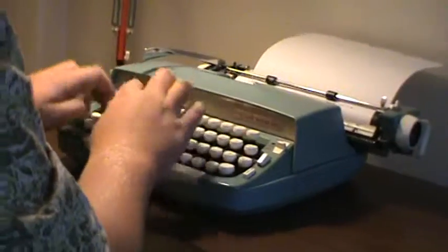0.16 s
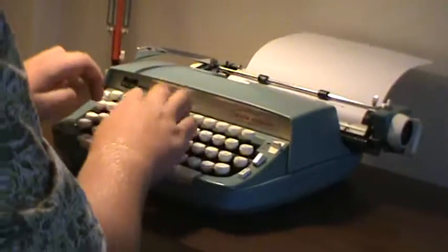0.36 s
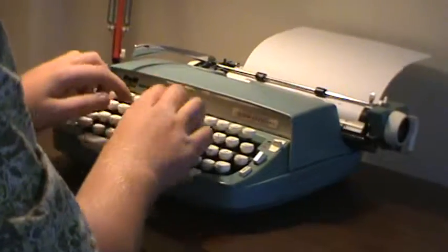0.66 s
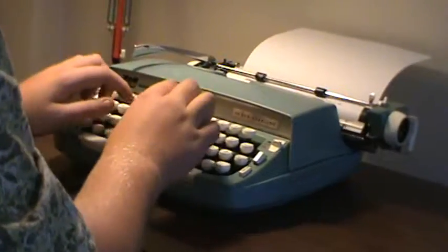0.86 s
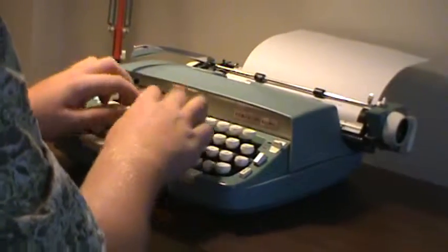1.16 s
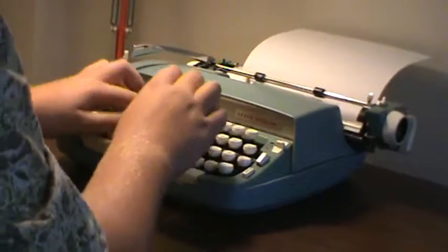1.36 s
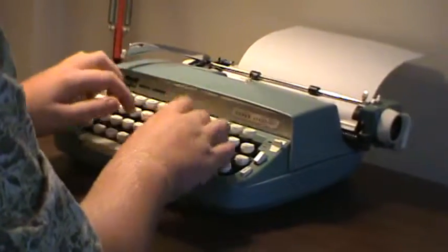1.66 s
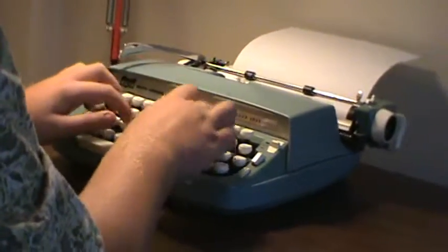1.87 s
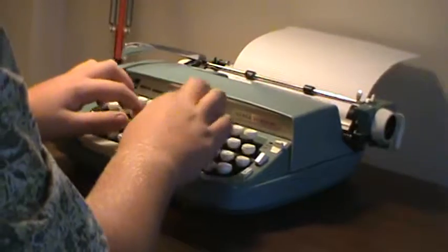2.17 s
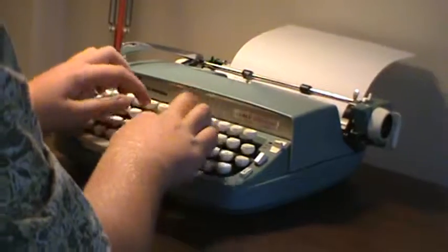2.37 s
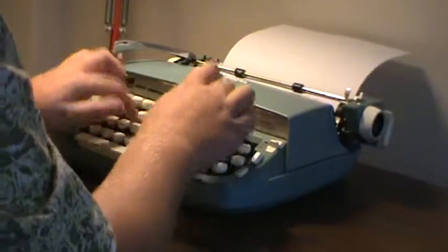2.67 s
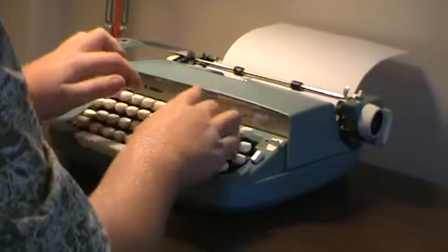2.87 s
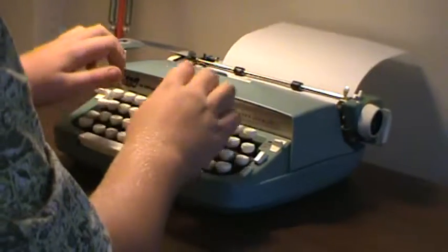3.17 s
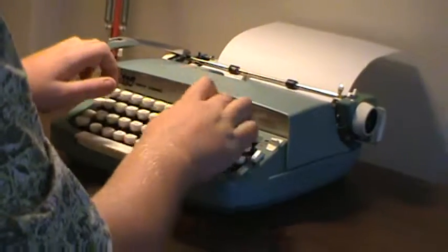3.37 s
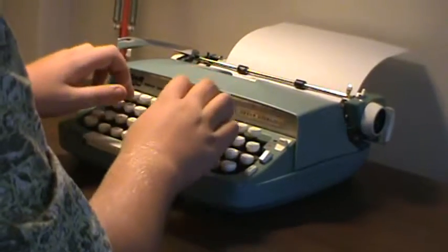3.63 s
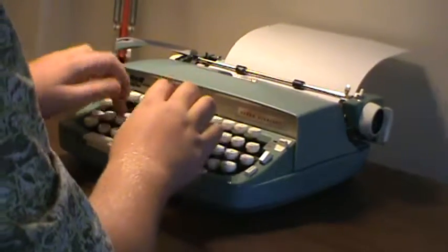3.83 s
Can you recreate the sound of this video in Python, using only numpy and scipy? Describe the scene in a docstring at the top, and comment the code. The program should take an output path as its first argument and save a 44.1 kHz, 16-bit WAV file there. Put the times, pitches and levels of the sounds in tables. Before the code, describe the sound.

Close by in a small, quiet room, someone types on a manual typewriter. Sharp, bright clacks with a light metal ring come in short bursts, then a longer run, followed by lever rattles, a snap and a final strike.

```python
"""Manual typewriter in a bare room

On a wooden desk in a small room, close and centred before a stereo microphone, typed in uneven bursts.
Each key rattles its linkage, slaps a type bar on the platen, steps the carriage and drops back.
The walls return every slap in the same pattern; the recorder's fast limiter flattens it into a clack."""
import sys
import numpy as np
from scipy import signal
from scipy.fft import rfft, irfft
from scipy.io import wavfile
from scipy.ndimage import uniform_filter1d, minimum_filter1d

SR = 44100
rng = np.random.default_rng(int(sys.argv[2]) if len(sys.argv) > 2 else 0)


def dump(signal):
    """Clip the signal to [-1, 1] and save it as 16-bit WAV at the path in sys.argv[1]."""
    limited = np.clip(np.atleast_2d(signal).T, -1, 1)
    pcm = np.round(limited * 32767).astype(np.int16)
    wavfile.write(sys.argv[1], SR, pcm)


N = 176400


# letters typed: t/s, level/dB, brightness/(dB per octave), key travel/s, key rattle/dB, fall-back/dB
STRIKES = [(0.015, 18.5, 0.5, 0.039, 14, -3), (0.2336, 16.5, 2, 0.041, 0.5, -12),
           (0.3026, 17, 1.5, 0.043, 3, -15), (.451, 20, 1, 0.046, 0.5, 0), (1.085, 19, 1, 0.043, -1.5, -6),
           (1.2503, 19, 1.5, 0.032, -18, -21), (1.3843, 19, 1, 0.032, 0, 1.5),
           (1.6987, 18.5, 1.5, .043, 2, -5), (1.8687, 19, 0, 0.052, -1, -8),
           (2.008, 19.5, 0, 0.04, -3, -11), (2.1273, 20.5, 2, 0.036, -9.5, -2.5),
           (2.2972, 17.5, 2, 0.056, -10, -1), (2.3886, 17.5, 1, 0.044, -17, 2),
           (2.5108, 19.5, 2, 0.052, -6.5, -20), (2.629, 15, 0, 0.04, -5.5, 6.5),
           (2.75, 20.5, 4.5, 0.033, 0, -17), (2.907, 15, 0.5, 0.046, 1.5, -12),
           (3.023, 16, 2, 0.026, -9, -6), (3.8229, 20.5, 3, 0.037, -1, -1.5)]

def type_bars(count=4, variation=.3):
    """Nearly the same sharp slap on the platen for every letter, dealt in turn to a few tracks."""
    tracks, usual_slap = np.zeros((count, N)), burst()
    for k, (s, db, bright_db, *_) in enumerate(STRIKES):
        slap = unit(usual_slap + variation * burst())
        add(tracks[k % count], s, amp(db) * tilt(slap, bright_db))
    return tracks


# the slap head-on at the microphone: f/Hz, level/dB
CRACK_SPECTRUM = [(600, -26), (1800, -20), (3500, 9.5), (6000, 9), (8700, 14), (10300, -0.5), (12500, -1),
                  (14000, -6), (16000, -18)]

def platen_crack(slaps, bounce_s=.011, bounce_db=2.5):
    """The slap arrives straight from the platen, then comes back once with its treble intact."""
    crack = amp(-13) * colour(slaps, CRACK_SPECTRUM)
    add(crack, bounce_s, amp(bounce_db) * crack)
    return crack


# modes of the type bars: f/Hz, level/dB
BAR_MODES = [(5329, 0), (5626, -2), (5879, 0), (6197, -1), (6442, -2), (6966, -2)]

def bar_ring(track, detune=.04, t60=.42):
    """The struck bars ring on, each track at a slightly different pitch."""
    pitch = 1 + detune * rng.uniform(-1, 1)
    ringing = ring([(hz * pitch, db, t60) for hz, db in BAR_MODES])
    return amp(-14) * signal.oaconvolve(track, ringing)[:N]


# light rattles of the space bar and levers: t/s, level/dB
LEVER_RATTLES = [(.624, -3.5), (.688, -1.5), (1.559, -1.5), (3.3096, -3.5), (3.345, -4), (3.502, -3)]
# the linkage from close by: f/Hz, level/dB
LINKAGE_SPECTRUM = [(60, -15), (150, -2.5), (260, -3.5), (480, 3.5), (800, 0), (1300, 2.5), (2500, 2),
                    (5000, 3), (8000, -1), (11500, -2.5), (16000, -15)]

def linkage(trip_s=.0099, fall_s=.122, key_t60=.12, fall_t60=.11):
    """Levers rattle as a key goes down, trips the escapement and lets its bar fall back."""
    out = np.zeros(N)
    for s, _, _, travel_s, key_db, fall_db in STRIKES:
        add(out, s - travel_s, amp(key_db) * rattle(key_t60))
        add(out, s - trip_s, amp(-2) * rattle(key_t60))
        add(out, s + fall_s, amp(fall_db) * rattle(fall_t60))
    for s, db in LEVER_RATTLES:
        add(out, s, amp(db) * rattle(fall_t60))
    return colour(out, LINKAGE_SPECTRUM)


# keys coming to rest: t/s, level/dB, f/Hz
KEY_KNOCKS = [(.63, -10.5, 547), (1.195, -13, 523), (1.227, -10, 344), (1.905, -8, 466), (2.335, -11, 435),
              (3.502, -7, 450), (3.511, -13.5, 342)]
# a dull wooden knock: f/Hz, level/dB
KNOCK_SPECTRUM = [(50, -23), (110, -16), (145, -1.5), (180, -11), (330, -3.5), (520, 3), (720, -4.5),
                  (1400, 1.5), (3000, -15.5), (12000, -49)]

def frame_knocks(step_s=.03, t60=.062):
    """The carriage stops against the frame; resting keys knock it with a short note of their own."""
    thuds, notes = np.zeros(N), np.zeros(N)
    for s, *_ in STRIKES:
        add(thuds, s + step_s, amp(-4) * rattle(t60))
    for s, db, hz in KEY_KNOCKS:
        add(thuds, s, .5 * amp(db) * rattle(t60))
        add(notes, s, amp(db) * ring([(hz, 0, t60)]))
    return colour(thuds, KNOCK_SPECTRUM) + notes


# snaps after the space bar: t/s, level/dB
SPACE_SNAPS = [(3.378, 5), (3.3808, 8), (3.385, 0.5)]
# the snap from close by: f/Hz, level/dB
SNAP_SPECTRUM = [(200, -12), (500, 0.5), (2000, -1.5), (4600, 3.5), (5900, 9.5), (7500, 1.5), (9500, -6.5),
                 (16000, -16)]

def escapement():
    """The escapement snaps on a space, metal on metal in quick succession."""
    out = np.zeros(N)
    for s, db in SPACE_SNAPS:
        add(out, s, amp(db) * burst())
    return colour(out, SNAP_SPECTRUM)


# clinks of the shift mechanism: t/s, level/dB, brightness/(dB per octave)
SHIFT_CLINKS = [(0.6928, 0, -3), (1.582, -5, -8)]
# its modes: f/Hz, level/dB, t60/s
SHIFT_MODES = [(2120, -4, .012), (2125, -32, .25), (4350, 0, .005), (4750, 0, .005), (7700, -4, .004)]

def shift_mechanism():
    """A short blow sets the metal of the shift mechanism clinking."""
    out = np.zeros(N)
    for s, db, bright_db in SHIFT_CLINKS:
        clink = signal.fftconvolve(burst(), ring(SHIFT_MODES))
        add(out, s, amp(db) * unit(tilt(clink, bright_db)))
    return out


# pings of the spring: t/s, level/dB
SPRING_PINGS = [(.13, -13), (3.151, -14.5)]
# its modes: f/Hz, level/dB, t60/s
SPRING_MODES = [(11100, 0, .03), (11400, -6, .1)]

def return_spring():
    """A small return spring pings, high and brief."""
    out = np.zeros(N)
    for s, db in SPRING_PINGS:
        add(out, s, amp(db) * ring(SPRING_MODES))
    return out


def desk_sway(delay_s=.0404, length_s=.097, sway_hz=66.2):
    """The desk sways under the machine, soft and low, after each carriage step."""
    out, t = np.zeros(N), np.arange(0, length_s, 1 / SR)
    swell = amp(-48.5) * np.sin(np.pi * t / length_s) ** 2
    for s, *_ in STRIKES + SPACE_SNAPS[:1]:
        hz = sway_hz * (1 + .079 * rng.standard_normal())
        add(out, s + delay_s, swell * np.sin(2 * np.pi * hz * t))
    return out


# echoes off the near walls: delay/s, level/dB, lag of the right channel/s
WALL_ECHOES = [(.0059, -7.5, 0), (.013, -8.5, -.00006), (.0205, -15, 0), (.0255, -9.5, -.00004),
               (.0287, -13.5, 0)]

def room(x, usual_tail, variation=.55):
    """Distinct wall echoes, then a tail that shifts a little as hands and carriage move."""
    response = np.sqrt(1 - variation ** 2) * usual_tail + variation * tail()
    for delay, db, lag in WALL_ECHOES:
        add(response[0], delay, amp([db]))
        add(response[1], delay + lag, amp([db]))
    return signal.fftconvolve(x[None], response, axes=1)[:, :N]


# the slap as it leaves for the walls: f/Hz, level/dB
SLAP_SPECTRUM = [(100, -38.5), (450, -20.5), (1500, -17.5), (2400, -14), (3400, -10), (4600, -9.5),
                 (5900, 1), (7200, -7.5), (8800, -11), (10500, -20.5), (15500, -36.5)]

def reflected_slaps(tracks, usual_tail):
    """The room returns a duller slap, each track with a slightly different tail."""
    return sum(room(colour(track, SLAP_SPECTRUM), usual_tail) for track in tracks)


# decay of the bare room: f/Hz, t60/s
ROOM_DECAY = [(150, .45), (1200, .54), (3000, .47), (6000, .44), (15000, .33)]
# stereo width at the microphone: f/Hz, side level/dB
ROOM_WIDTH = [(100, -29), (700, -9.5), (1500, -4.5), (9000, -4.5), (12000, -15)]

def tail(start_s=.00067, build_s=.028):
    """Diffuse reverberation from all around, nearly mono in the bass."""
    hz, when, bands = signal.stft(rng.standard_normal((2, SR)), SR, nperseg=256)
    bands = bands * fade(when, read(ROOM_DECAY, hz)[:, None])
    bands[1] *= amp(read(ROOM_WIDTH, hz))[:, None]
    build_up = np.clip((np.arange(SR) / SR - start_s) / build_s, 0, 1)
    mid, side = signal.istft(bands, SR, nperseg=256)[1][:, :SR] * build_up
    return np.array([mid + side, mid - side]) / np.linalg.norm(mid)


# the quiet room behind the machine: f/Hz, level/dB
HUSH_SPECTRUM = [(25, -1), (60, 17.5), (110, 0), (500, 7.5), (2300, -9.5), (14000, -13.5)]

def room_tone(level_db=-59.5, width=.27):
    """A faint, steady hush, narrow between the channels."""
    mid, side = (amp(level_db) * colour(rng.standard_normal(N), HUSH_SPECTRUM) for _ in range(2))
    return mid + width * np.array([side, -side])


def burst(length_s=.0028, size=512, passes=3):
    """A few milliseconds of dense metal chatter with an even spectrum."""
    shape = np.exp(-(np.arange(size) / SR / length_s) ** 2)
    x = rng.standard_normal(size) * shape
    for _ in range(passes):
        x = whiten(x)
        envelope = np.sqrt(abs(uniform_filter1d(x ** 2, size=24)) + 1e-12)
        x = shape * x / envelope
    for _ in range(2 * passes):
        x = whiten(x) * shape ** .25
    return unit(x)


def rattle(t60, contacts_per_s=12000, spread_db=3, rise_s=.003, size=8192):
    """A dying cluster of tiny contacts of uneven size."""
    t = np.arange(size) / SR
    strengths = amp(spread_db * np.minimum(rng.exponential(1, size), 2))
    signs = rng.choice([-1, 1], size)
    contacts = rng.random(size) < contacts_per_s / SR
    return unit(strengths * signs * contacts * np.minimum(t / rise_s, 1) * fade(t, t60))


def ring(modes):
    """Decaying partials of a struck part."""
    t = np.arange(SR) / SR
    return unit(sum(amp(db) * fade(t, t60) * np.sin(2 * np.pi * (hz * t + rng.random()))
                    for hz, db, t60 in modes))


def colour(x, points, size=4096):
    """Minimum-phase filter of unit energy with the given spectrum."""
    log_gain = np.log(amp(read(points, abs(np.fft.fftfreq(size, 1 / SR)))))
    taps = np.fft.ifft(np.exp(np.conj(signal.hilbert(log_gain)))).real
    return signal.oaconvolve(x, unit(taps[:size // 2]))[:len(x)]


def tilt(x, bright_db):
    """Brightens a blow by so many dB per octave about 6 kHz."""
    octaves = np.log2(np.maximum(np.fft.rfftfreq(len(x), 1 / SR), 1000) / 6000)
    return irfft(rfft(x) * amp(bright_db * octaves), len(x))


def whiten(x):
    """Flattens the spectrum, keeping the phases."""
    return irfft(np.exp(1j * np.angle(rfft(x))))


def amp(db):
    """Decibels to gain."""
    return 10 ** (np.asarray(db) / 20)


def read(points, hz):
    """A table's value on a log-frequency axis."""
    f, value = np.transpose(points)
    return np.interp(np.log(hz + 1), np.log(f), value)


def unit(x):
    """Scales to an energy of one."""
    return x / np.sqrt(np.sum(x ** 2) + 1e-20)


def fade(t, t60):
    """Exponential decay, 60 dB down at t60."""
    return np.exp(-np.log(1000) * t / t60)


def add(mix, s, sound):
    """Mixes a sound in at s seconds."""
    at = round(s * SR)
    sound = sound[max(-at, 0):]
    part = mix[max(at, 0):][:len(sound)]
    part += sound[:len(part)]


def scene():
    """At the microphone: the machine in the centre, the walls around it, faint room tone behind."""
    tracks, usual_tail = type_bars(), tail()
    mechanism = linkage() + frame_knocks() + escapement() + shift_mechanism() + return_spring()
    direct = platen_crack(tracks.sum(0)) + amp(.5) * mechanism + desk_sway()
    reflected = reflected_slaps(tracks, usual_tail) + room(mechanism, tail())
    ringing = sum(bar_ring(track) for track in tracks)
    return direct + reflected + ringing + room_tone()


def record(dry, limit_db=-11, recover_db_per_s=223, sense_s=.0005, ahead_s=.0016, cutoff_hz=15950):
    """The recorder's look-ahead limiter ducks each slap and recovers quickly; a low-pass follows."""
    power = uniform_filter1d((dry ** 2).mean(0), round(sense_s * SR))
    over_db = np.maximum(10 * np.log10(abs(power) + 1e-12) - limit_db, 0)
    recovery = np.arange(N) * recover_db_per_s / SR
    gain_db = recovery - np.maximum.accumulate(over_db + recovery)
    ahead = round(ahead_s * SR)
    gain_db = uniform_filter1d(minimum_filter1d(gain_db, 2 * ahead + 1), ahead)
    low_pass = signal.firwin(511, cutoff_hz, window=("kaiser", 9), fs=SR)
    return signal.oaconvolve(dry * amp(gain_db), low_pass[None], "same")


dry = scene()
out = record(dry)
dump(out)
```